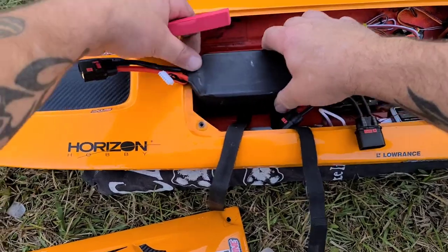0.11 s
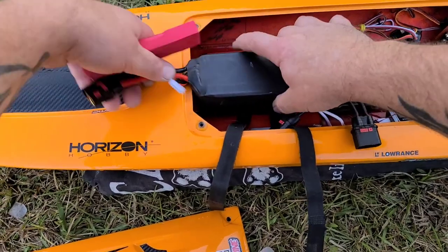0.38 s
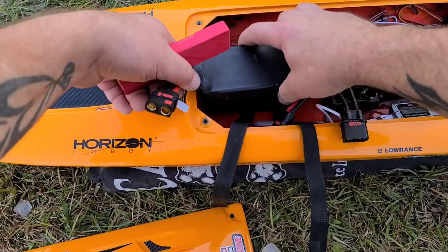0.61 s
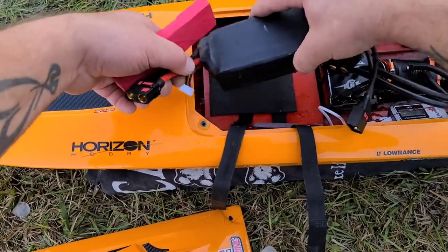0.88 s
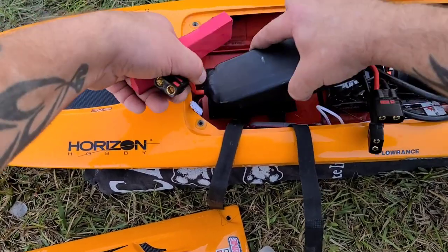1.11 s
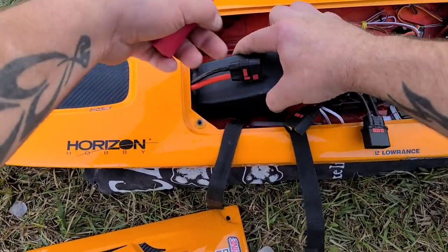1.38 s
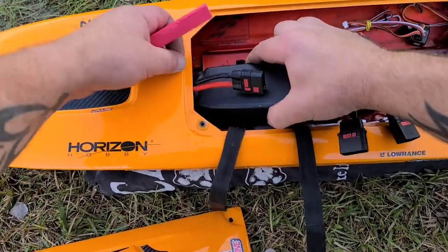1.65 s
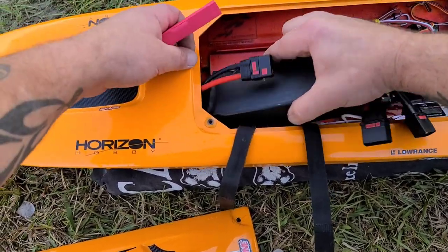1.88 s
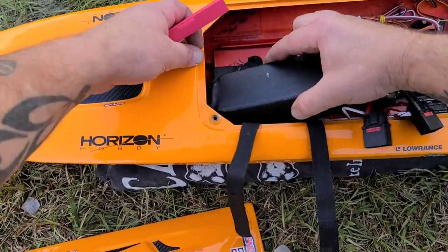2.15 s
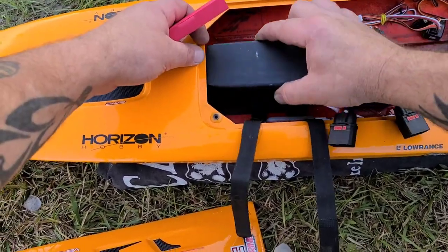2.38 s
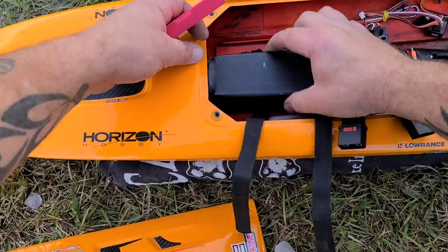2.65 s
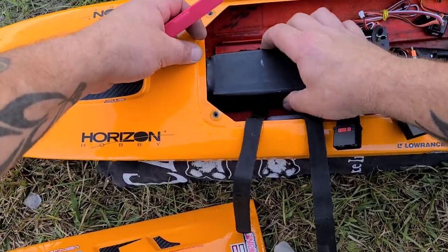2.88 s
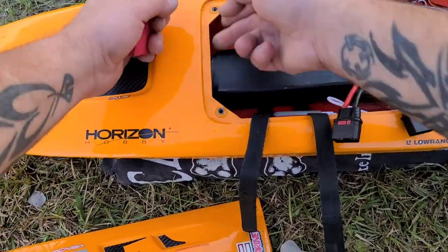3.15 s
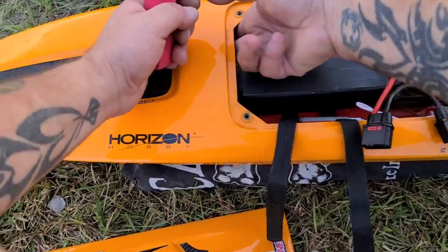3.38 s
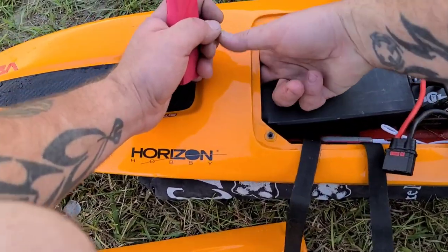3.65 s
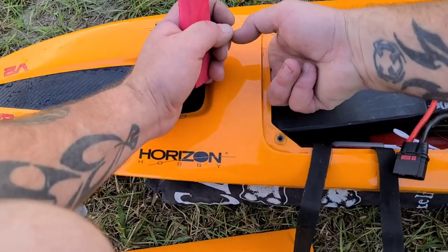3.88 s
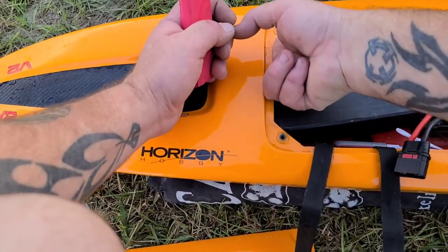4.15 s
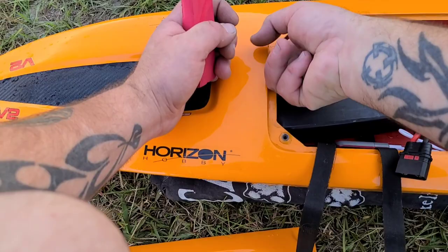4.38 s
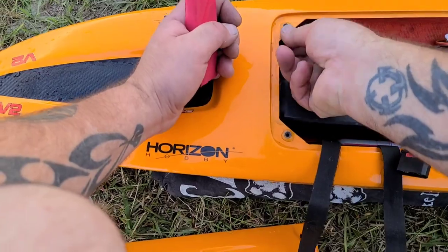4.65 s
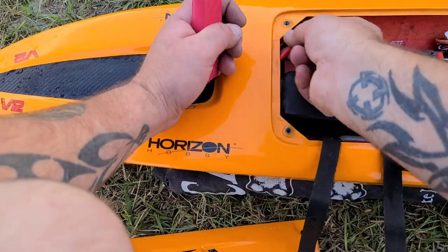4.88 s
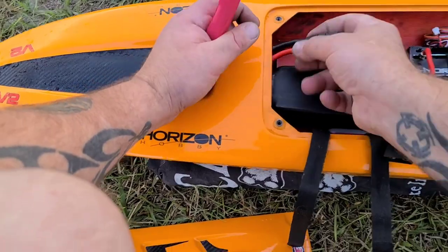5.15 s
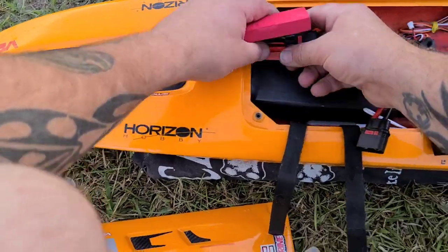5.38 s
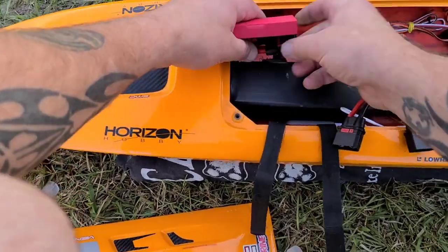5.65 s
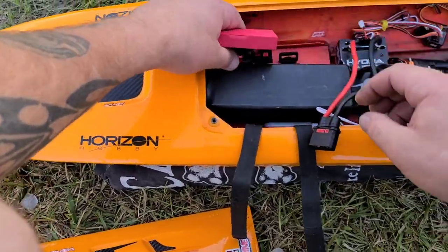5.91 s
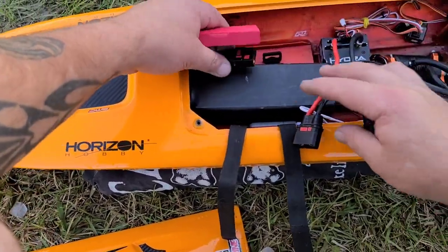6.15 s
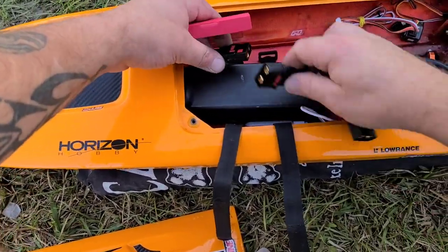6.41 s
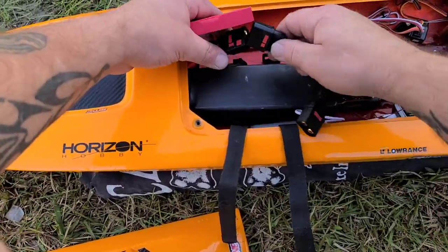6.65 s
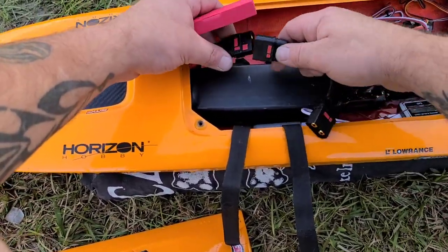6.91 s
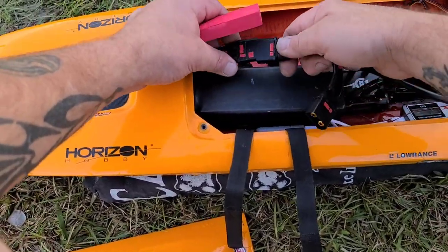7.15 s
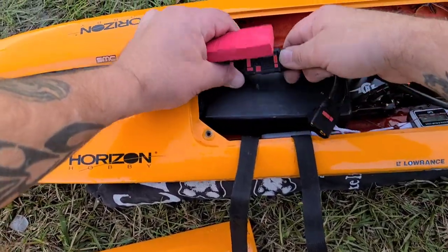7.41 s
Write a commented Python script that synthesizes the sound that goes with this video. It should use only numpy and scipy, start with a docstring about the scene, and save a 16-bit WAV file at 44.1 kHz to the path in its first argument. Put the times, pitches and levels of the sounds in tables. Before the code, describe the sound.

Close hollow knocks, short drags and plug clicks on a plastic model boat hull, over a faraway wavering engine and soft open-air hiss.

```python
"""Battery pack pressed into a boat hull

A heavy pack is lifted, slid and pressed into a hollow plastic hull on a lawn, close to a camera's two microphones.
Blows, drags and soft touches ring one set of damped hull modes; ticks are short shaped noise, plugs clack,
and random slips make the pack case and the hatch rim sing. Far off, a wavering engine note rises and settles
under a swell of noisy roar, over low traffic rumble and open-air hiss."""
import sys
import numpy as np
from scipy import signal
from scipy.fft import rfft, irfft, next_fast_len
from scipy.io import wavfile
from scipy.ndimage import uniform_filter1d, map_coordinates

SR = 44100
rng = np.random.default_rng(int(sys.argv[2]) if len(sys.argv) > 2 else 0)


def natural_amplitude(level_db):
    """Convert a level in decibels to a linear amplitude factor, elementwise."""
    exponent = np.asarray(level_db, float) / 20
    return 10 ** exponent


def transcribe(signal):
    """Save signal, clipped to [-1, 1], as a 16-bit WAV file at the path in sys.argv[1]."""
    frames = np.atleast_2d(signal).T
    limited = np.clip(frames, -1, 1)
    pcm = np.round(limited * 32767).astype(np.int16)
    wavfile.write(sys.argv[1], SR, pcm)


N = 332073  # length in samples


def unit(x):
    """Scales a sound to rms 1."""
    return x / np.sqrt(np.mean(x ** 2) + 1e-20)


def along(points, hz):
    """Reads (Hz, value) points on a logarithmic frequency axis."""
    f, v = np.transpose(points)
    return np.interp(np.log(hz + 1), np.log(f + 1), v)


def curves(rows):
    """Draws one value per sample for each column after the time."""
    s, *cols = np.transpose(rows)
    return [np.interp(np.arange(N) / SR, s, c) for c in cols]


def wobble(rate):
    """A smooth random curve with rate knots a second."""
    knots = rng.standard_normal(int(N * rate / SR) + 4)
    return map_coordinates(knots, [np.arange(N) * rate / SR])


def filtered(x, response):
    """Shapes x by a response given as a function of frequency."""
    m = next_fast_len(x.shape[-1] + 4096)
    spectrum = rfft(x, m) * response(np.fft.rfftfreq(m, 1 / SR))
    return irfft(spectrum, m)[..., :x.shape[-1]]


def far(colour, lead_s=0):
    """Far noise of rms 1: the two microphones hear it partly alike, and the left one may hear it first."""
    # Likeness of far sound at the two microphones. Each row: frequency in Hz, correlation from -1 to 1.
    alike = [(60, 0.97), (290, 0.82), (640, 0.2), (1400, 0.17), (3100, 0.4), (6000, 0.2)]
    mono_below_hz = 750  # the lead fades out below this, so the bass arrives together

    def shares(hz):
        """Mid and side shares that give the wanted correlation."""
        turn = np.arccos(np.clip(along(alike, hz), -1, 1)) / 2
        return natural_amplitude(along(colour, hz)) * [np.cos(turn), np.sin(turn)]

    def lead(hz):
        """Half the lead forward on the left, half back on the right."""
        return np.exp(1j * np.pi * hz * lead_s * [[1], [-1]] / (1 + (mono_below_hz / (hz + 1)) ** 6))

    mid, side = filtered(rng.standard_normal((2, N)), shares)
    return unit(filtered(np.array([mid + side, mid - side]), lead))


def vehicle():
    """A wavering engine note with a weak octave, and noise for the roar of tyres and exhaust."""
    # Engine note. Each row: time in seconds, mean firing rate in Hz, mean level in dB.
    engine = [(0, 95, -45.5), (1, 96, -47.5), (1.5, 100, -79), (2.6, 102, -50), (3.05, 120, -48),
              (3.4, 117, -42), (3.7, 100, -52), (4.0, 90, -45.5), (4.3, 74, -40.5), (4.45, 73, -38),
              (5.2, 73, -38.5), (6.35, 73, -41), (6.6, 72, -55.5), (7, 72, -46), (7.53, 72, -47.5)]
    # Tyre and exhaust roar. Each row: time in seconds, mean level in dB.
    roar = [(0, -56.5), (2.4, -55.5), (2.9, -53), (3.2, -43.5), (3.5, -41.5), (3.9, -41), (4.3, -53.5),
            (4.8, -57), (7.53, -54)]
    # Colour of the roar. Each row: frequency in Hz, relative density in dB per Hz.
    roar_colour = [(120, -34), (235, -4.5), (310, -29), (385, -7.5), (550, -17), (690, -2.5), (850, -7.5),
                   (1100, -14.5), (1380, -13.5), (1650, -18.5), (1910, -13.5), (2300, -21.5), (2900, -39),
                   (6000, -28.5), (10000, -28.5), (16000, -37)]

    hz, db = curves(engine)
    phase = 2 * np.pi * np.cumsum(hz * (1 + 0.0045 * wobble(5.87))) / SR
    tone = np.sin(phase) + natural_amplitude(-19.0) * np.sin(2 * phase)
    note = np.sqrt(2) * natural_amplitude(db + 1.2 * wobble(10)) * tone
    roar_level = natural_amplitude(curves(roar)[0] + 3.4 * wobble(9.0))
    return note + roar_level * far(roar_colour)


def air():
    """Distant traffic rumble and open-air hiss, two coloured noises that drift in level."""
    # Drift of the traffic rumble. Each row: time in seconds, mean level in dB.
    rumble_db = [(0, -44), (3.3, -39.5), (4.2, -44.5), (5.5, -41.5), (6.6, -45), (7.53, -42.5)]
    # Colour of the traffic rumble. Each row: frequency in Hz, relative density in dB per Hz.
    rumble_colour = [(15, -56), (28, -5), (45, 0), (60, 3.5), (100, 0), (160, -6), (250, -11.5), (400, -13),
                     (600, -22.5), (1000, -26), (2000, -41.5), (4000, -100)]
    # The hiss thins as the traffic recedes. Each row: time in seconds, mean level in dB.
    hiss_db = [(0, -51.2), (3.5, -50.7), (4.8, -52.2), (7.53, -52.7)]
    # Colour of the hiss. Each row: frequency in Hz, relative density in dB per Hz.
    hiss_colour = [(470, -35), (800, -6), (1000, -2), (1250, -6), (1900, -3.5), (2600, -6.5), (3250, -1.5),
                   (3700, -2.5), (4200, -9.5), (6500, -9), (8000, -10.5), (10500, -15), (13500, -15),
                   (15800, -16)]

    hiss = natural_amplitude(curves(hiss_db)[0] + .3 * wobble(1.0)) * far(hiss_colour, lead_s=.000575)
    rumble = natural_amplitude(curves(rumble_db)[0] + 1.0 * wobble(3)) * far(rumble_colour)
    return rumble + hiss


def add(out, s, sound):
    """Places a sound, and the short random paths by which it reaches two spaced microphones differently."""
    t = np.arange(SR // 100) / SR
    paths = rng.standard_normal(len(t)) * natural_amplitude(-60 * t / 0.014)
    side = signal.fftconvolve(sound, paths / np.linalg.norm(paths))[:len(sound)]
    out[:, round(s * SR):][:, :len(sound)] += [sound, side]


def hull(low_hz, upper_hz, focus_db, upper_focus_db, free=1, contact_s=0.0029):
    """Low and upper ring of the hull: the place of touch favours the modes near low_hz and upper_hz."""
    # Damped modes of the free shell. Each row: nominal frequency in Hz, relative level in dB, t60 in seconds.
    hull_modes = [(164, -2.5, 0.17), (241, 4, 0.044), (290, -0.5, 0.063), (336.4, -1.5, 0.056),
                  (380, 0, 0.074), (430, -1, 0.071), (480, -4, 0.061), (533.3, -3.5, 0.052),
                  (600, 4, 0.027), (653.4, -2.5, 0.052), (727.5, -1, 0.042), (790, -2, 0.046),
                  (910, 5.5, 0.013), (924, -0.5, 0.016), (1068, 7, 0.036), (1179, 2, 0.053),
                  (1340, 2.5, 0.051), (1434, -6, 0.044), (1550, 8, 0.02), (1647, -3.5, 0.059),
                  (1785, -6.5, 0.018), (1912, 1, 0.033), (2157, 2, 0.033), (2345, 9, 0.019),
                  (2590, 3, 0.032), (2900, 10.5, 0.037), (3060, -19, 0.01), (4130, -9, 0.026)]
    split_hz = 1000  # modes above this answer mostly to hard contact

    hz, db, t60 = np.transpose(hull_modes)[..., None]
    t = np.arange(SR // 12) / SR
    low = hz < split_hz
    low_loss = focus_db * np.log2(hz / low_hz) ** 2  # dB lost with octaves squared from the centre
    upper_loss = upper_focus_db * np.log2(hz / upper_hz) ** 2
    db = db - np.where(low, low_loss, upper_loss)
    chance = rng.standard_normal((3, *hz.shape))
    hz = hz * (1 + 0.021 * chance[0])  # the hand's load detunes the shell
    swell = 1 - np.exp(-(t / np.where(low, contact_s, .0018)) ** 2)  # a padded contact lasts a few ms
    decay = natural_amplitude(db + 3.7 * chance[1] - 60 * t / (free * t60))
    rings = swell * decay * np.sin(2 * np.pi * hz * t + 0.66 * chance[2])
    return (rings * low).sum(0), (rings * ~low).sum(0)


def slips(count, rate, spread_db):
    """Stick-slip: random pushes, rate a second on average, with a long-tailed size."""
    chance, size, sign = rng.random((3, count))
    return (chance < rate / SR) * natural_amplitude(-spread_db * np.log(size + 1e-9)) * np.sign(sign - .5)


def fumble():
    """Small soft touches keep the hull murmuring between the blows, its modes varied at random."""
    # Hands and cables shifting softly on the hull. Each row: time in seconds, mean level in dB.
    fumble_db = [(0, -49), (.5, -47), (1, -51), (1.6, -48), (2.1, -48), (2.6, -44), (2.9, -47), (3.5, -50),
                 (4.1, -46), (4.6, -45), (5, -53), (5.55, -48), (6, -53), (6.6, -52), (7, -53), (7.53, -55)]
    stretch = round(.3 * SR)  # the modes are redrawn every 0.3 s

    out = np.zeros((2, N + SR))
    touches = slips(N, 400, spread_db=2.2) * natural_amplitude(2 * wobble(12))
    push = unit(touches) * natural_amplitude(curves(fumble_db)[0])
    for start in range(0, N, stretch):
        low, upper = hull(414, 1500, focus_db=4.5, upper_focus_db=6)
        body = low + natural_amplitude(-22) * upper
        add(out, start / SR, signal.fftconvolve(push[start:start + stretch], body / np.linalg.norm(body)))
    return out[:, :N]


def knocks():
    """Each blow swells the low modes; a harder one rings the upper modes louder and higher."""
    # Blows on the hull. Each row: start in seconds, low ring peak in dB, its centre in Hz,
    # hardness as upper ring re low ring in dB.
    blows = [(0.154, -21, 620, -15.5), (0.305, -35.5, 480, -11), (0.328, -32, 517, -12),
             (0.353, -25.5, 400, -19), (0.459, -31.5, 460, -12), (0.481, -15.5, 440, -22.5),
             (0.644, -38, 445, 2.5), (1.1075, -4.5, 536, -17.5), (1.118, -11, 430, -19),
             (1.147, -12.5, 505, -20), (1.158, -16, 480, -20), (1.304, -27, 600, -12),
             (1.366, -21.5, 493, -24), (1.4646, -23, 380, -12), (1.494, -22.5, 520, -4),
             (1.5241, -29, 550, 1), (1.559, -24.5, 550, -7), (1.75, -29, 480, -20), (1.786, -19, 480, -8.5),
             (1.798, -30.5, 397, -0.5), (1.875, -27, 485, -11), (2.018, -16, 540, -5.5),
             (2.032, -30, 394, -16), (2.159, -26, 390, -35), (2.262, -5.5, 690, -11.5),
             (2.269, -12.5, 520, -18), (2.278, -7, 554, -10), (2.337, -8, 600, -12),
             (2.3435, -13, 640, -18), (2.352, -14.5, 480, -13), (2.404, -27, 600, -2),
             (2.4485, -4.5, 660, -22.5), (2.661, -25, 284, -15.5), (3.966, -21.5, 450, -7.5),
             (4.016, -28.5, 570, -8), (4.104, -16.5, 454, -10.5), (4.142, -25, 390, -13),
             (4.2255, -7, 630, -5.5), (4.234, -13.5, 428, -8.5), (4.328, -18.5, 600, -14),
             (4.351, -15, 695, -12), (4.421, -27, 600, -20), (4.466, -22.5, 515, -32),
             (4.489, -14, 453, -8), (4.513, -15.5, 524, -7), (4.568, -25, 480, -13), (4.595, -30, 480, -11),
             (4.644, -27.5, 420, -7), (4.66, -23, 480, -11.5), (4.953, -21.5, 387, -12.5),
             (4.974, -21.5, 294, -26), (5.512, -27, 360, -14.5), (5.575, -31, 840, -14),
             (5.585, -29, 267, -9.5), (5.991, -31, 290, -25), (6.132, -34.5, 380, -26),
             (6.364, -27.5, 725, -8.5), (6.536, -32, 575, -7), (6.669, -20.5, 790, -13.5),
             (6.681, -27.5, 520, -11), (6.842, -15, 600, -20), (7.006, -31.5, 380, -12),
             (7.236, -34, 550, -11), (7.363, -35.5, 450, -2)]
    hard_hz, octaves_per_db = 1326, .008  # upper ring centre at hardness 0, and its rise per dB of hardness
    swell_s, halvings_per_db = 0.0023, .04  # swell time at hardness 0, and its shortening per dB

    out = np.zeros((2, N + SR))
    for s, low_db, low_hz, hard_db in blows:
        upper_hz = hard_hz * 2 ** (octaves_per_db * hard_db)
        contact_s = swell_s * 2 ** (-halvings_per_db * hard_db)
        # the holding hand leaves 0.78 of the free ring time
        low, upper = hull(low_hz, upper_hz, focus_db=13, upper_focus_db=13.0, free=0.78, contact_s=contact_s)
        blow = low / abs(low).max() + natural_amplitude(hard_db) * upper / abs(upper).max()
        add(out, s, natural_amplitude(low_db) * blow)
    return out[:, :N]


def grit():
    """Bright noise of hard edges rasping, rms 1."""
    # Colour of the rasp. Each row: frequency in Hz, relative density in dB per Hz.
    grit_colour = [(1500, -31), (2800, 2), (4000, 0), (5000, -1.5), (8000, -2.5), (9500, -2.5),
                   (13000, -3.5), (16000, -13)]
    return unit(filtered(rng.standard_normal(N + SR), lambda hz: natural_amplitude(along(grit_colour, hz))))


def scrapes():
    """A dragged edge slips unevenly: each slip rings the hull and spits grit."""
    # Pack, cables and straps dragged over the hull. Each row: start in seconds, length in seconds,
    # low ring level in dB, its centre in Hz, roughness as grit re low ring in dB.
    drags = [(0.459, 0.057, -44, 413, -17), (1.0854, 0.014, -43, 600, -7), (1.133, 0.039, -37, 430, -45),
             (1.433, 0.018, -53.5, 580, -0.5), (1.485, 0.05, -49.5, 470, -10),
             (1.762, 0.066, -52, 450, -25), (1.863, 0.03, -62, 447, -31), (2.138, 0.056, -44, 400, -53),
             (2.273, 0.035, -32.5, 504, -19.5), (2.307, 0.066, -32.5, 430, -15),
             (2.348, 0.036, -48, 434, -5.5), (2.382, 0.034, -39.5, 406, -12),
             (2.426, 0.014, -43.5, 420, -15), (2.507, 0.15, -44, 530, -9.5), (2.644, 0.058, -45, 310, -34),
             (2.724, 0.081, -38.5, 480, -38), (2.755, 0.026, -56, 450, -3), (2.873, 0.028, -46.5, 426, -42),
             (3.657, 0.1, -37, 414, -16), (3.699, 0.024, -45, 423, -11), (3.952, 0.03, -43, 443, -11),
             (4.015, 0.0097, -54.5, 536, -3), (4.102, 0.032, -41, 430, -8), (4.141, 0.06, -41.5, 420, -12),
             (4.162, 0.019, -42.5, 362, -9), (4.2, 0.012, -42, 430, -13), (4.21, 0.022, -40, 700, -17),
             (4.297, 0.086, -33.5, 526, -35.5), (4.466, 0.078, -38, 480, -23), (4.55, 0.067, -47, 453, -38),
             (4.634, 0.061, -38, 420, -33), (4.955, 0.031, -44.5, 354, -52), (6.55, 0.051, -52, 750, -16),
             (6.678, 0.053, -50.5, 650, -15), (7.002, 0.056, -57, 510, -13), ]
    rasp_hz, octaves_per_db = 1900, 0.016  # upper ring centre at roughness 0, and its rise per dB
    rasp_db, rasp_share = -6.5, 0.42  # upper ring re low ring at roughness 0, and dB gained per dB
    dull_above_hz, dull_slope = 3600, 0.06  # a smoother drag loses treble: dB per octave per dB of roughness

    out, edge = np.zeros((2, N + SR)), grit()
    for s, length, low_db, low_hz, rough_db in drags:
        upper_hz = rasp_hz * 2 ** (octaves_per_db * rough_db)
        upper_db = low_db + rasp_db + rasp_share * rough_db
        grit_db = low_db + rough_db
        n = round(length * SR) + 8
        stroke = np.pad(np.sin(np.pi * np.arange(n) / n) ** 0.32, (0, 2048))  # room to ring on
        low, upper = hull(low_hz, upper_hz, focus_db=7.5, upper_focus_db=31)
        push = stroke * slips(len(stroke), 1000, spread_db=1.5)
        low_ring = signal.fftconvolve(push, low)[:len(push)]
        upper_ring = signal.fftconvolve(push, upper)[:len(push)]
        dull = lambda hz: natural_amplitude(dull_slope * rough_db * np.log2(np.maximum(hz / dull_above_hz, 1)))
        lumps = abs(stroke * uniform_filter1d(abs(push), size=180)) ** 0.66  # grit follows the slips
        spit = lumps * filtered(edge[round(s * SR):][:len(push)], dull)
        layers = natural_amplitude(low_db) * unit(low_ring) + natural_amplitude(upper_db) * unit(upper_ring) + natural_amplitude(grit_db) * unit(spit)
        add(out, s, layers * np.sqrt(len(stroke) / n))  # levels hold over the stroke without its padding
    return out[:, :N]


def ticks():
    """Hard edges, plugs and buckles tick: short decaying noise in a band, higher for small parts."""
    # Ticks. Each row: start in seconds, peak level in dB, centre in Hz.
    snaps = [(1.088, -29, 6540), (1.107, -37, 5960), (1.465, -32, 6140), (1.785, -37, 6000),
             (1.798, -38.5, 6000), (2.019, -37, 2500), (2.262, -28.5, 5650), (2.279, -27.5, 8900),
             (2.404, -25.5, 7000), (2.447, -33.5, 6100), (3.773, -40, 10000), (3.91, -42, 10000),
             (3.967, -32.5, 9000), (4.017, -31.5, 11000), (4.105, -10.5, 12400), (4.167, -31, 11000),
             (4.2005, -28, 10000), (4.2265, -26, 6700), (4.489, -44, 5000), (4.957, -36, 7000),
             (6.535, -37, 2400), (6.669, -40, 5000), (6.681, -42, 5300), (7.004, -38, 4770),
             (7.3605, -35, 16000)]

    out, t = np.zeros((2, N + SR)), np.arange(SR // 20) / SR
    for s, db, centre_hz in snaps:
        band = lambda hz: natural_amplitude(-12 * np.log2((hz + 1) / centre_hz) ** 2)
        noise = filtered(rng.standard_normal(len(t)), band)
        click = noise * natural_amplitude(-60 * t / 0.021) * (1 - np.exp(-t / 0.0006))
        add(out, s, natural_amplitude(db) * click / abs(click).max())
    return out[:, :N]


def ring(modes):
    """Damped sines with a soft onset, each at a slightly new level every time."""
    hz, db, t60 = np.transpose(modes)[..., None]
    t = np.arange(SR // 12) / SR
    decay = natural_amplitude(db + rng.normal(0, 0.53, hz.shape) - 60 * t / t60)
    return (decay * np.sin(2 * np.pi * hz * t)).sum(0) * (1 - np.exp(-t / 0.0006))


def plugs():
    """Hard plug bodies knock together with a short bright pitch."""
    # Plug bodies clacking. Each row: start in seconds, peak level in dB.
    clacks = [(1.4656, -13.5), (1.51, -35), (5.334, -33), (7.357, -36), (7.3598, -29)]
    # Plug modes. Each row: frequency in Hz, mean relative level in dB, t60 in seconds.
    plug_modes = [(1656, -1, 0.015), (1794, 0, 0.0084), (1950, -7.5, 0.016), (3200, -16, 0.013)]

    out = np.zeros((2, N + SR))
    for s, db in clacks:
        clack = ring(plug_modes)
        add(out, s, natural_amplitude(db) * clack / abs(clack).max())
    return out[:, :N]


def slides(strokes, modes):
    """Slips under a sliding part keep its modes ringing in narrow bands."""
    out = np.zeros((2, N + SR))
    for s, length, db in strokes:
        n = round(length * SR)
        push = np.sin(np.pi * np.arange(n) / n) ** 0.5 * slips(n, 1200, spread_db=2.0)
        sing = signal.fftconvolve(push, ring(modes))
        add(out, s, natural_amplitude(db) * unit(sing) * np.sqrt(len(sing) / n))
    return out[:, :N]


def singing_case():
    """The pack slides on its seat and stick-slip makes its case sing."""
    # Slides of the pack. Each row: start in seconds, length in seconds, level in dB.
    case_strokes = [(2.262, 0.013, -49), (2.279, 0.026, -50), (2.313, 0.012, -48.5), (2.348, .034, -47.5),
                    (2.403, 0.012, -47.5), (2.431, .009, -60), (2.512, 0.017, -60.5), (2.538, 0.046, -53),
                    (2.6, .035, -59), (2.745, 0.046, -51.5), (2.798, 0.034, -61)]
    # Pack case modes. Each row: frequency in Hz, mean relative level in dB, t60 in seconds.
    case_modes = [(1672, -0.5, 0.026), (1280, -8.5, 0.022)]
    return slides(case_strokes, case_modes)


def cable_over_rim():
    """A cable pulled over the hatch rim sets the rim ringing by stick-slip."""
    # Pulls of the cable. Each row: start in seconds, length in seconds, level in dB.
    cable_pulls = [(3.665, 0.092, -44.5), (4.11, 0.027, -52.5), (4.15, .075, -53), (4.47, 0.057, -57)]
    # Rim modes. Each row: frequency in Hz, mean relative level in dB, t60 in seconds.
    rim_modes = [(1290, -3, 0.013), (1626, 3, 0.014), (1840, 3.5, 0.014), (2840, 2, 0.016)]
    return slides(cable_pulls, rim_modes)


def near(pair):
    """Left and right from the shared sound and the difference, which grows with pitch."""
    # Difference between the microphones for the near hull. Each row: frequency in Hz, side re mid in dB.
    spread = [(110, -13), (380, -19), (750, -12), (1290, -2), (15000, -1)]
    mid, side = pair[0], filtered(pair[1], lambda hz: natural_amplitude(along(spread, hz)))
    return np.array([mid + side, mid - side])


def scene():
    """Handling close by, vehicle and air far off."""
    distance = vehicle() + air()
    touches = fumble() + knocks() + scrapes()
    small_parts = ticks() + plugs()
    singing = singing_case() + cable_over_rim()
    return near(touches + small_parts + singing) + distance


def top_cut(x):
    """Nothing passes above the cut-off."""
    return signal.sosfilt(signal.butter(12, 16970, fs=SR, output="sos"), x)


def record(dry):
    """The camera body shades the two ports differently, and the band ends at a sharp upper limit."""
    # Lean of the ports. Each row: frequency in Hz, left re right in dB.
    lean = [(100, -1.5), (260, -2.5), (420, -.3), (800, 2.5), (1200, -3.5), (2200, -1.5), (4200, -5),
            (6500, .5), (15000, 1.5)]
    top_hz = 15750
    wet = filtered(dry, lambda hz: (hz < top_hz) * natural_amplitude(.5 * along(lean, hz) * [[1], [-1]]))
    return top_cut(wet)


dry = scene()
out = record(dry)
transcribe(out)
```